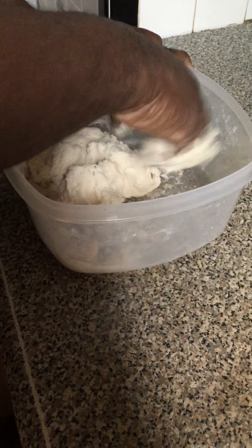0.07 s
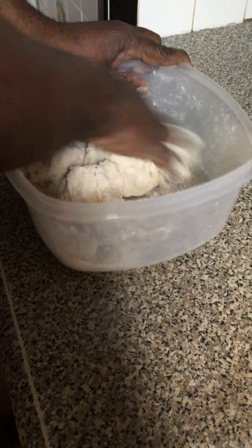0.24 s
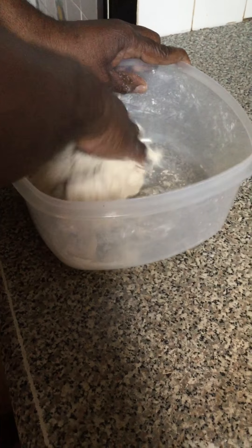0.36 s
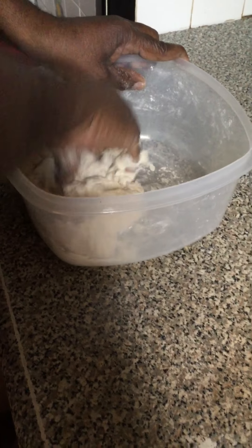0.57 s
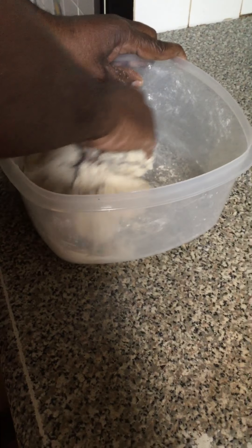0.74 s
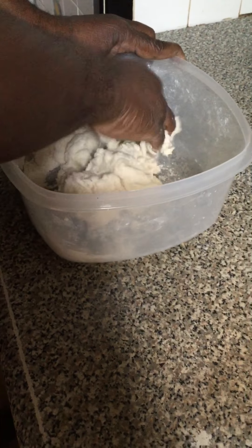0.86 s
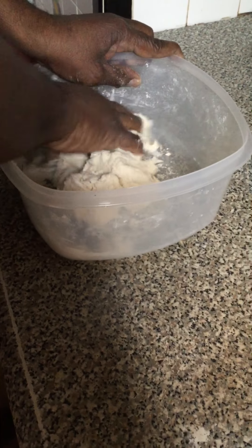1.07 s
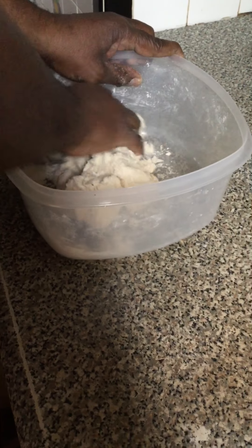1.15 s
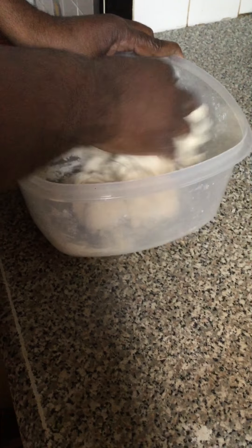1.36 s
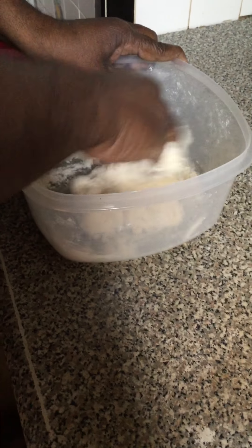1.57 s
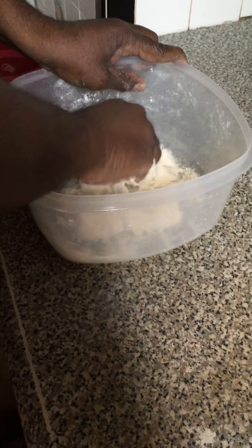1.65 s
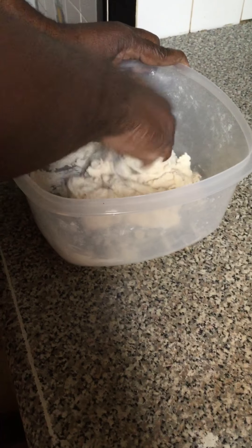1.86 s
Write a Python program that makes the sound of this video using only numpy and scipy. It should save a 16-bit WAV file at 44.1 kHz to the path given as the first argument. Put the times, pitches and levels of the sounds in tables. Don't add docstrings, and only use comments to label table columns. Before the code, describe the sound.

Kneading dough in a plastic tub, close up in a small kitchen. Soft rubbing starts, then at 0.2-0.35 s a loud hollow knock cluster with plastic clicks, a sticky snap and a bright rub. Gentler brushing and bumps follow to 0.9 s. Thuds and a crisp rub come at 1.05-1.15 s, a dry snap and knock at 1.53 s, then faint taps and rubs. Low murmur and faint appliance hum underneath.

```python
import sys
import numpy as np
from scipy import signal
from scipy.fft import rfft, irfft, next_fast_len
from scipy.io import wavfile
from scipy.ndimage import uniform_filter1d, map_coordinates

SR = 44100
rng = np.random.default_rng(int(sys.argv[2]) if len(sys.argv) > 2 else 0)


def ratio(d):
    e = np.asarray(d, float) / 20
    return 10 ** e


def to_wav(sig):
    pcm = np.clip(np.atleast_2d(sig), -1, 1) * 32767
    pcm = np.round(pcm).astype(np.int16)
    wavfile.write(sys.argv[1], SR, pcm.T)


N = 83790

# peak t/s, level/dB, rise/(dB/s), fall/(dB/s), dullness/dB
STROKES = [(0.0, -53.5, 97, 154, 4.5), (0.22, -50.5, 2492, 142, 10), (.245, -44, 499, 181, 8),
           (0.317, -37.5, 291, 277, -3.5), (0.416, -46.5, 81, 142, 3.5), (0.542, -52, 69, 153, 5.5),
           (0.679, -50.5, 696, 88, -6), (0.815, -42.5, 112, 128, -3), (0.898, -51, 66, 226, 5.5),
           (1.031, -52.5, 800, 136, 3.5), (1.075, -60.5, 294, 90, 5), (1.131, -40.5, 312, 185, -4.5),
           (1.2, -53.5, 128, 85, 0.5), (1.268, -53, 65, 340, 1), (1.33, -76, 112, 80, 13),
           (1.42, -54.5, 250, 176, 7), (1.53, -57, 3500, 392, 14.5), (1.575, -69, 198, 157, 12.5),
           (1.624, -81, 1500, 504, -6), (1.65, -66, 54, 62, 8), (1.752, -50.5, 307, 124, -4.5),
           (1.9, -64, 300, 100, 1)]
# f/Hz, density/dB
FLOUR_SPECTRUM = [(410, -11.5), (700, -6), (1100, -3), (2200, -1), (6500, -2.5), (9500, -4.5),
                  (12000, -4.5), (15700, -8)]
# t/s, murmur level/dB
HAND_PRESSURE = [
    (0.0, -60),
    (0.126, -57),
    (0.418, -57.5),
    (0.567, -57.5),
    (0.766, -60),
    (1.062, -62),
    (1.21, -61.5),
    (1.576, -56.5),
    (1.746, -61),
    (1.9, -61.5),
]
# f/Hz, density/dB
MURMUR_SPECTRUM = [(50, -49), (110, -7.5), (200, -10), (295, 3), (420, -10.5), (600, -8.5), (760, -22),
                   (1200, -37.5)]
# f/Hz, density/dB
AIR_SPECTRUM = [(410, -86), (700, -14), (1590, -10.5), (2570, -15), (3250, -19), (3380, -16.5),
                (15700, -70)]
# t/s, level/dB, favoured f/Hz, crack level/dB, damping/1 (1 = free)
KNOCKS = [(0.111, -51.5, 570, -69, 2.3), (.2125, -31.5, 366, -60, 2.7), (0.2129, -30, 648, -41.5, 2),
          (0.2433, -19.5, 319, -60, 5.5), (0.2442, -28.5, 538, -43.5, 2.2), (0.269, -33.5, 445, -68, 1.17),
          (.284, -34.5, 370, -54.5, 2), (0.297, -36, 289, -55, 2.5), (.316, -42, 600, -57, 3),
          (0.342, -42, 263, -52.5, 3.1), (.435, -47, 443, -57, 1.35), (0.595, -44.5, 563, -58, 1.8),
          (0.661, -45, 630, -64, 3.6), (0.6635, -38, 350, -61, 1.9), (0.683, -43.5, 313, -62, 2.2),
          (.99, -54, 326, -81, 3.4), (1.002, -50, 690, -66, 5.1), (1.05, -37.5, 670, -61.5, 2.8),
          (1.107, -47, 337, -65, 6.1), (1.425, -61, 600, -86, 1.1), (1.472, -55, 533, -63, 2.3),
          (1.5268, -43.5, 520, -56.5, 2.4), (1.614, -52, 626, -69, 1.9), (1.62, -53, 650, -71, 1.9),
          (1.642, -51, 600, -61.5, 4.8), (1.668, -47, 423, -65, 1.7), (1.7, -46.5, 293, -76, 2.3)]
# f/Hz, level/dB, t60/s
TUB_MODES = [(92, -8, 0.42), (120, -3, 0.064), (140, 9, 0.12), (181, 1.5, 0.28), (285, -14, 0.039),
             (298, -5, 0.21), (383, 5, 0.12), (472, 0.5, 0.038), (526, 9.5, 0.12), (600, 6, 0.142),
             (676, -1, 0.087), (710, -45.5, 0.044)]
# f/Hz, width/Hz, level/dB
WALL_RESONANCES = [(900, 1050, 5.5), (1286, 470, 8), (1635, 260, 6), (2036, 220, 5.5), (2800, 1300, -1.5),
                   (5500, 3000, -14)]
# t/s, level/dB, f/Hz, t60/s
PINGS = [(.111, -60, 1510, .03), (.111, -55, 805, .03), (.2108, -18, 2100, .011), (.2125, -25, 1693, 0.029),
         (.212, -23.5, 2110, 0.024), (.2125, -33, 1357, 0.046), (.2108, -33, 2630, 0.018),
         (0.244, -30, 2290, 0.015), (.243, -42, 1600, .02), (0.242, -33, 936, 0.026),
         (0.316, -38, 2750, 0.049), (0.592, -45, 1403, 0.025), (.594, -53, 2240, .03),
         (.661, -51, 2730, .025), (0.661, -46.5, 1415, 0.054), (.662, -50, 2170, .03),
         (1.002, -50.5, 2200, .05), (1.002, -71, 1500, .03), (1.052, -43, 1036, 0.043),
         (1.128, -36, 5760, .015), (1.5275, -43, 1430, 0.039), (1.529, -46.5, 2060, 0.049),
         (1.527, -54, 3200, .02), (1.543, -55, 1970, 0.045), (1.641, -55, 2800, .025),
         (1.642, -50, 1390, 0.037), (1.643, -52, 2060, .03), (1.642, -57, 6400, .015),
         (1.669, -51, 2290, 0.037), (1.669, -57, 1700, .03)]
# t/s, level/dB, favoured f/Hz, damping/1 (1 = free)
THUDS = [(0.114, -47.5, 171, 1.6), (0.255, -27, 156.3, 1.4), (0.278, -33, 98, 1), (0.319, -40, 95, 2.9),
         (.442, -47.5, 120, 0.91), (.597, -49, 170, 2.3), (0.612, -41, 200, 1.14), (0.693, -50, 120, 0.67),
         (1.036, -38.5, 205, 1.7), (1.046, -34.5, 200, 1.25), (1.0503, -37, 340, 1.2),
         (1.091, -48, 92, 0.67), (1.151, -54, 92, 0.87), (1.729, -60, 95, .8), (1.052, -42.5, 108, 0.76),
         (1.534, -40, 198, 1.4), (1.566, -44.5, 240, 3.9), (1.5448, -41, 183, 4.5), (1.681, -50, 163, 0.81)]
# t/s, level/dB, t60/s
SNAPS = [
    (0.244, -25.5, 0.0083),
    (0.3, -55, 0.018),
    (.316, -35, 0.043),
    (1.5257, -35.5, 0.005),
    (1.5282, -40, 0.012),
    (1.623, -46, 0.013),
    (1.642, -56, .012),
]


def unit(x):
    return x / np.sqrt(np.mean(x ** 2) + 1e-20)


def wobble(rate_hz):
    knots = rng.standard_normal(int(N * rate_hz / SR) + 4)
    return map_coordinates(knots, [np.arange(N) * rate_hz / SR])


def filtered(x, response):
    m = next_fast_len(N + SR // 2)
    return irfft(rfft(x, m) * response(np.fft.rfftfreq(m, 1 / SR)), m)[..., :N]


def rush(spectrum, patchy_db, grain_db):
    f_hz, density_db = np.transpose(spectrum)
    grainy = rng.standard_normal(N) * ratio(grain_db * wobble(900))
    z = signal.stft(grainy, nperseg=512)[2]
    field = uniform_filter1d(rng.standard_normal(z.shape), 6, 0)
    field = uniform_filter1d(field, 6, 1)
    patchy = signal.istft(z * ratio(patchy_db * unit(field)), nperseg=512)[1][:N]
    log_f = np.log(f_hz + 1)
    return unit(filtered(patchy, lambda hz: ratio(np.interp(np.log(hz + 1), log_f, density_db))))


def place(sounds):
    x = np.zeros(N + SR)
    for s, sound in sounds:
        x[round(s * SR):][:len(sound)] += sound
    return x[:N]


def stroke_swells():
    stop_db = 54.5
    s, db, rise, fall, dull_db = np.transpose(STROKES)[..., None]
    late_s = np.arange(N) / SR - s
    slope = np.where(late_s < 0, rise, fall)
    under_db = np.hypot(slope * late_s, 1.5)
    power = ratio(2 * (db - under_db - under_db ** 2 / stop_db))
    bright = np.sqrt(power.sum(0))
    dull = np.sqrt((power * ratio(2 * dull_db)).sum(0))
    return bright, dull


def rubbing(bright, dull):
    dull_hz = 3060
    noise = rush(FLOUR_SPECTRUM, patchy_db=1.5, grain_db=0.5)
    low = filtered(noise, lambda hz: 1 / (1 + (hz / dull_hz) ** 4))
    return ratio(1.5 + 0.17 * wobble(29.94)) * (bright * (noise - low) + dull * low)


def murmur(bright):
    level_db, unrest_db, follow_share, follow_floor_db = -0.5, 1.2, 0.13, -73
    pressure_db = np.interp(np.arange(N) / SR, *np.transpose(HAND_PRESSURE))
    level = ratio(level_db + pressure_db + unrest_db * wobble(24.94))
    level = level * (1 + bright / ratio(follow_floor_db)) ** follow_share
    return level * rush(MURMUR_SPECTRUM, patchy_db=-2.5, grain_db=0.5)


def unsteady_tone(f_hz, level_db, sway_db, sway_hz, drift_rad, drift_hz):
    t = np.arange(N) / SR
    phase = 2 * np.pi * f_hz * t + drift_rad * wobble(drift_hz)
    return ratio(level_db + sway_db * wobble(sway_hz)) * np.sin(phase)


def room_tone():
    air_db = -66.5
    hum = unsteady_tone(183, -65.5, 3.5, 12, 1.2, 14)
    drone = unsteady_tone(300, -67, 3.5, 15, 1.5, 20)
    whine = unsteady_tone(3200, -75.5, 0.68, 4.2, 0.22, 14)
    return ratio(air_db) * rush(AIR_SPECTRUM, patchy_db=-2.5, grain_db=2.5) + hum + drone + whine


def blow(db, pitch_hz, damping, contact_cycles):
    spread_oct, scatter_db, soft_cycles, ring_db, swing_shape = 0.53, 3.5, 1.08, -9, 1.5
    t = np.arange(SR // 3) / SR
    hz, level_db, t60_s = np.transpose(TUB_MODES)[..., None]
    nearness = np.exp(-(np.log2(hz / pitch_hz) / spread_oct) ** 2)
    strength = nearness * ratio(level_db + scatter_db * rng.standard_normal(hz.shape))
    onset = 1 - np.exp(-(t * hz / soft_cycles) ** 2)
    modes = strength * ratio(-60 * damping * t / t60_s) * np.sin(2 * np.pi * hz * t) * onset
    share = np.clip(t * pitch_hz / contact_cycles, 0, 1)
    swell = np.sin(np.pi * share ** 0.6) ** swing_shape
    swing = swell * np.sin(2 * np.pi * pitch_hz * t * (1.12 - 0.15 * share))
    return ratio(db) * (swing + ratio(ring_db) * modes.sum(0))


def crack(db):
    t60_s, attack_s = 0.035, 0.00017
    t = np.arange(SR // 3) / SR
    burst = ratio(db + 15.5 - 60 * t / t60_s) * (1 - np.exp(-t / attack_s))
    return burst * rng.standard_normal(len(t))


def walls(f):
    total = 0
    for k, (centre_hz, width_hz, db) in enumerate(WALL_RESONANCES):
        damped = 1j * f * width_hz
        total = total + (-1) ** k * ratio(db) * damped / (centre_hz ** 2 - f * f + damped)
    return total


def knocks():
    ring = place((s, blow(db, hz, damping, 4)) for s, db, hz, _, damping in KNOCKS)
    cracks = place((s, crack(crack_db)) for s, _, _, crack_db, _ in KNOCKS)
    return ring + filtered(cracks, walls)


def ping(db, f_hz, t60_s):
    attack_cycles = 1.3
    t = np.arange(SR // 10) / SR
    onset = 1 - np.exp(-t * f_hz / attack_cycles)
    return ratio(db - 60 * t / t60_s) * np.sin(2 * np.pi * f_hz * t) * onset


def pings():
    return place((s, ping(db, hz, t60_s)) for s, db, hz, t60_s in PINGS)


def thuds():
    return place((s, blow(db, hz, damping, 2.18)) for s, db, hz, damping in THUDS)


def snaps():
    bottom_hz, top_hz = 1510, 11900
    t = np.arange(SR // 20) / SR
    bursts = place((s, ratio(db - 60 * t / t60_s) * rng.standard_normal(len(t))) for s, db, t60_s in SNAPS)
    return filtered(bursts, lambda hz: 1j * hz / (bottom_hz + 1j * hz) / (1 + 1j * hz / top_hz) ** 2)


def kitchen(x):
    level_db, t60_s, gap_s = -15, 0.25, 0.004
    t = np.arange(SR // 3) / SR
    tail = rng.standard_normal(len(t)) * ratio(-60 * t / t60_s) * (t > gap_s)
    return ratio(level_db) * signal.fftconvolve(x, tail / np.linalg.norm(tail))[:N]


def scene():
    bright, dull = stroke_swells()
    hand = rubbing(bright, dull) + murmur(bright)
    blows = knocks() + pings() + thuds() + snaps()
    return (hand + room_tone() + blows + kitchen(blows))[None]


def low_pass(x):
    return signal.sosfilt(signal.butter(12, 16510, fs=SR, output="sos"), x)


def record(dry):
    low_cut_hz, top_hz = 104, 15800
    mix = filtered(dry, lambda hz: (hz < top_hz) / np.sqrt(1 + (low_cut_hz / (hz + 1)) ** 8))
    return low_pass(mix)


dry = scene()
out = record(dry)
to_wav(out)
```